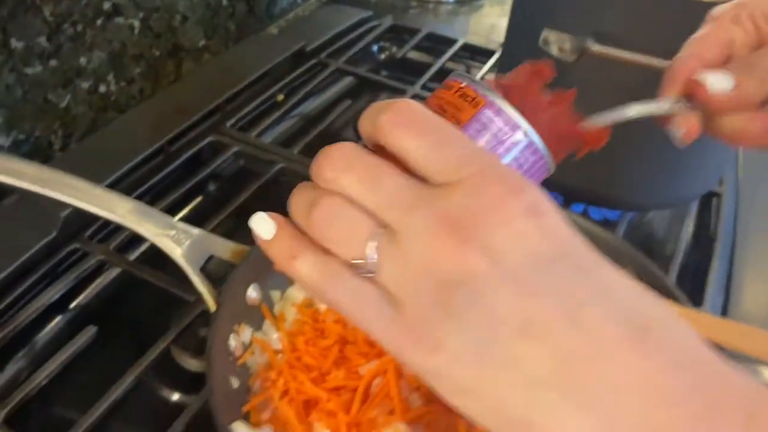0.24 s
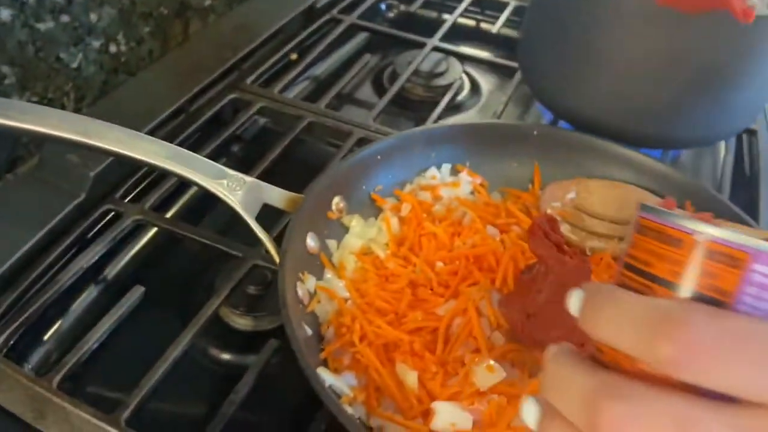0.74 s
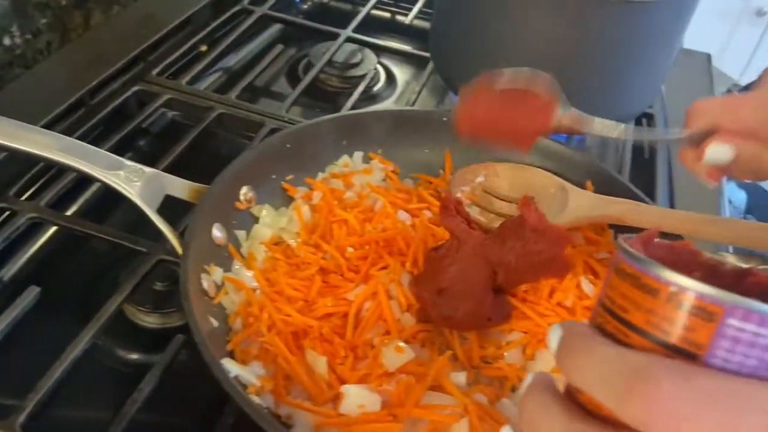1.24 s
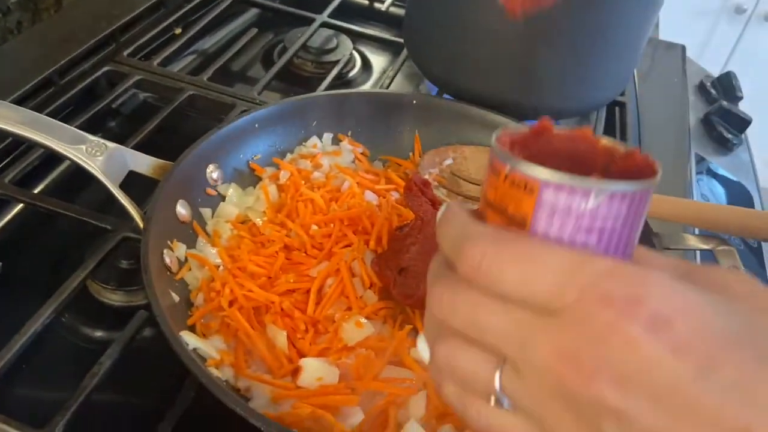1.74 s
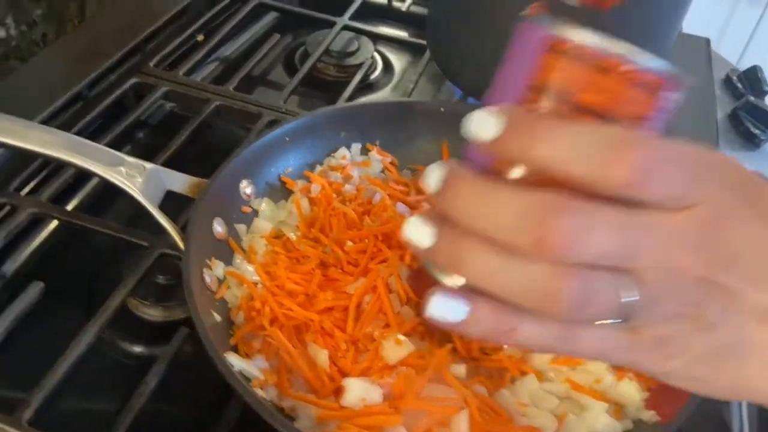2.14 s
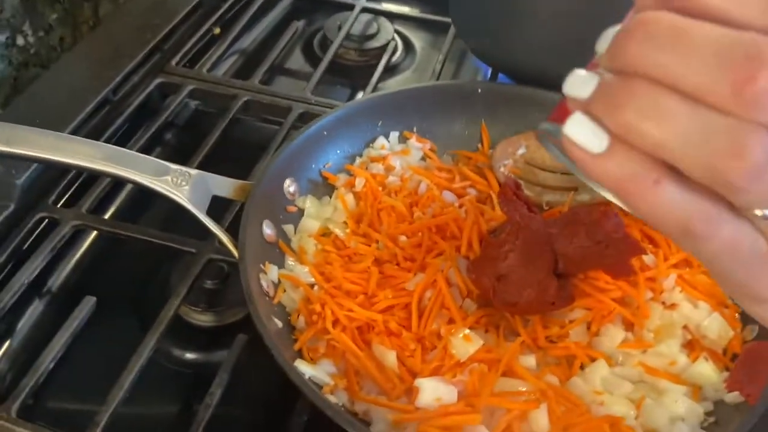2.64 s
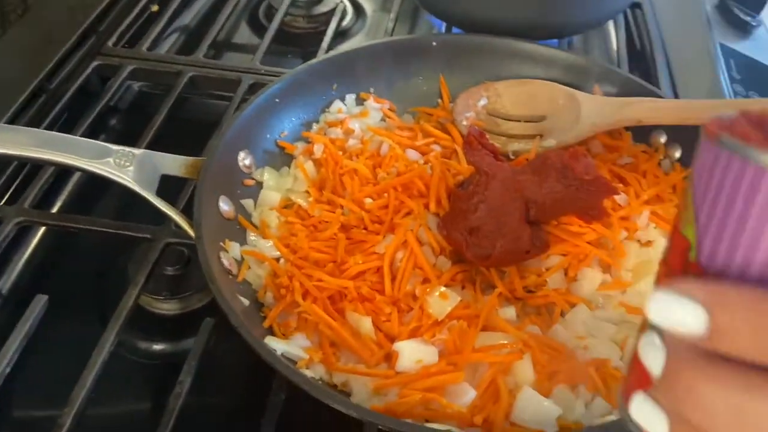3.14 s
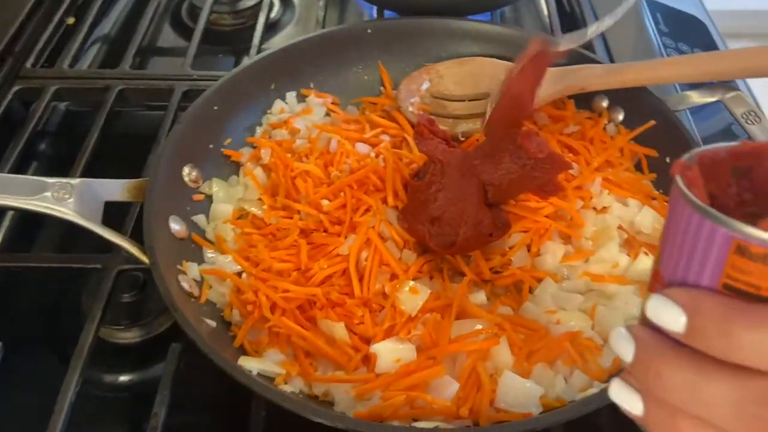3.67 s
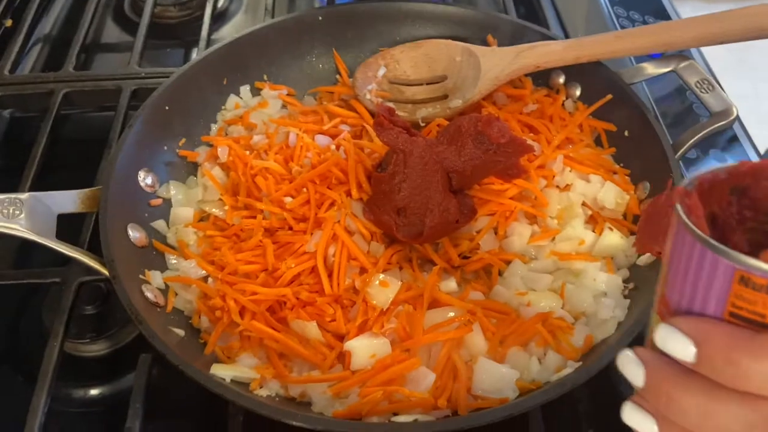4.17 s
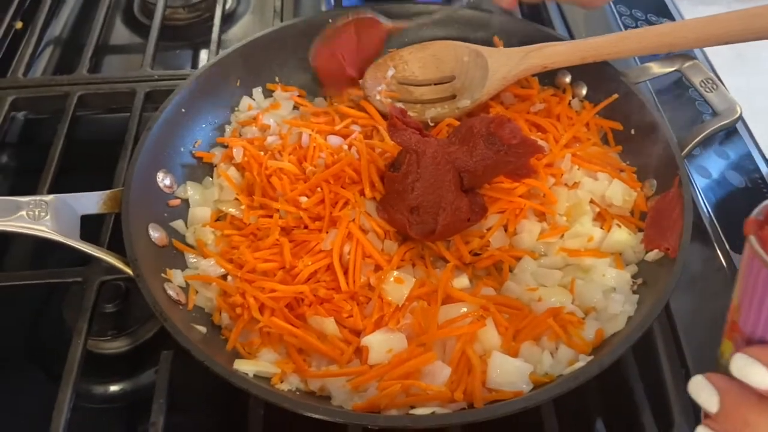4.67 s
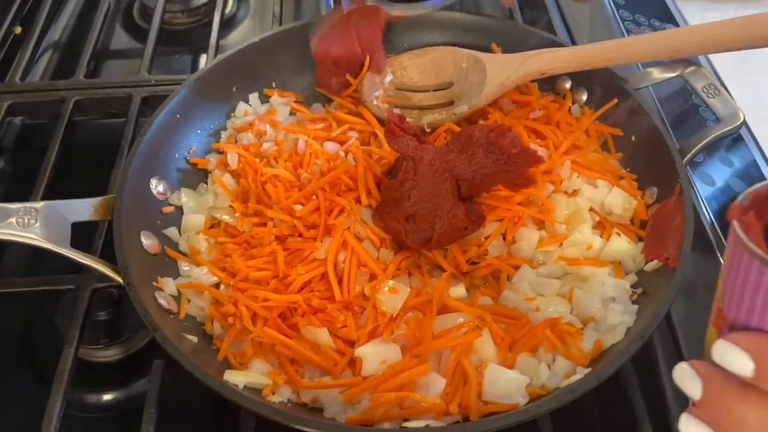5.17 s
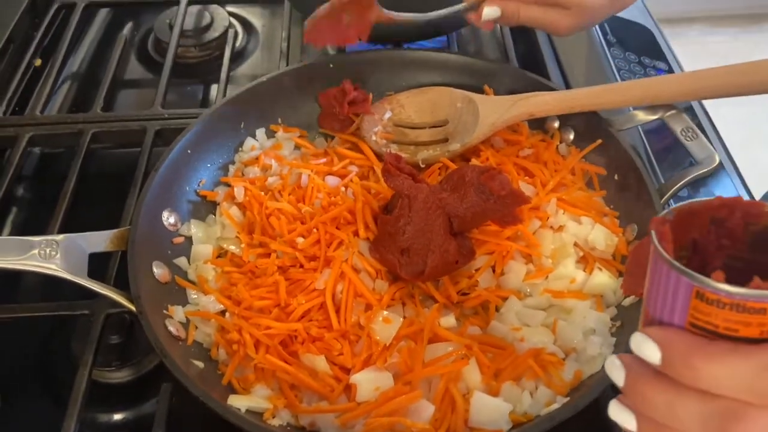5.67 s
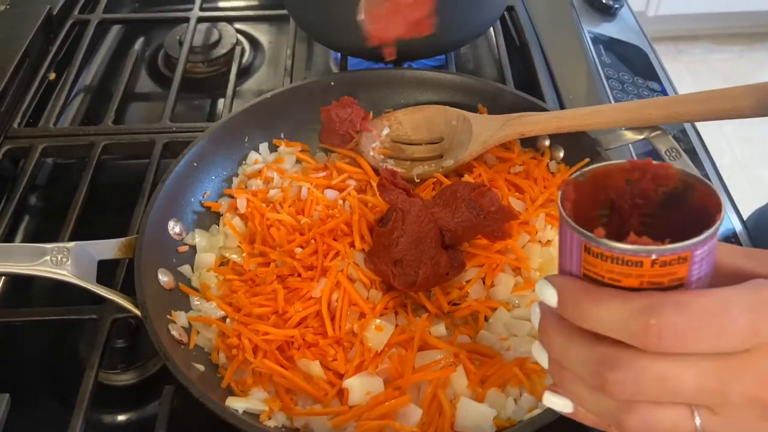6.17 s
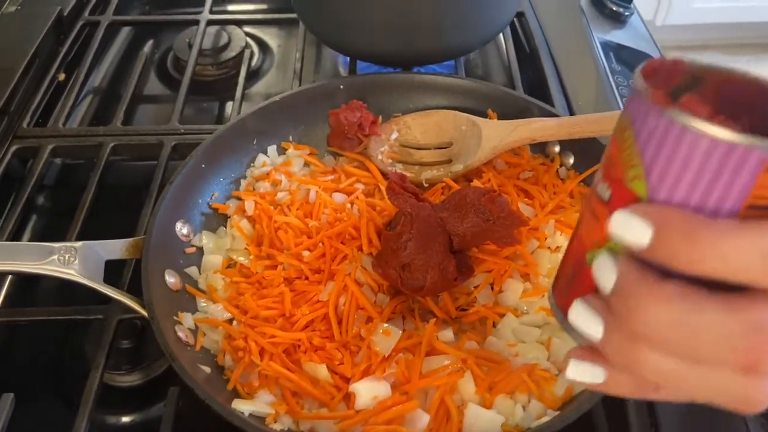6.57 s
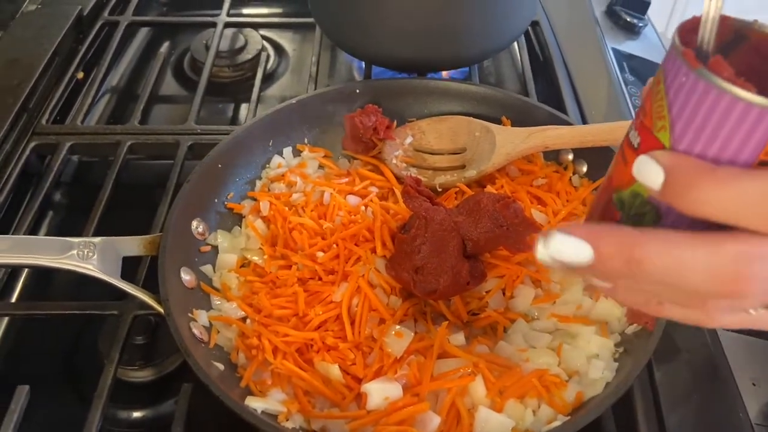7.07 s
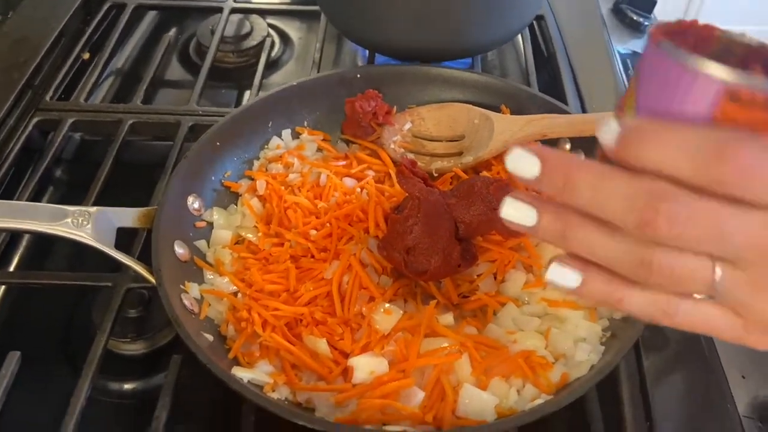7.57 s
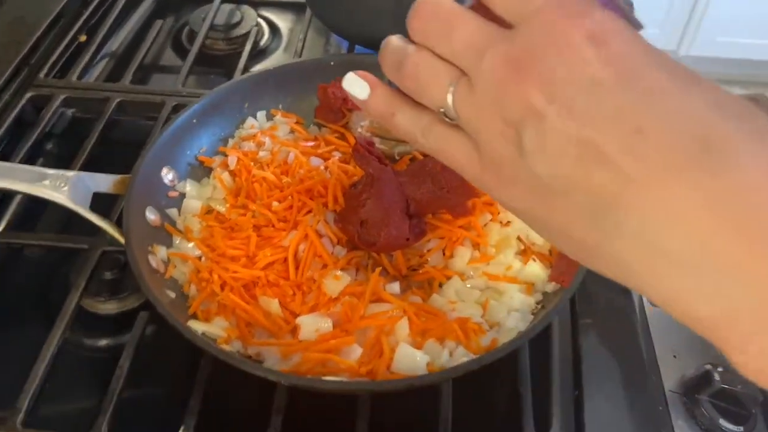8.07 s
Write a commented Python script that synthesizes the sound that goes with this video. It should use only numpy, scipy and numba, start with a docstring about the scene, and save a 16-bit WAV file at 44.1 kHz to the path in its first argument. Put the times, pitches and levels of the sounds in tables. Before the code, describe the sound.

Vegetables sizzle softly while a steel spoon digs in a hollow-sounding can and taps a ringing frying pan in a steady run.

```python
"""Vegetables sizzle quietly over a gas burner in a small kitchen, all on the left channel.
A steel spoon digs tomato paste out of a small can, at the start and again after 2 s, scraping and
knocking so that the air in the can hoots. From 4.7 s it is rapped nine times on the rim of the frying
pan, which rings and rocks on the stove grate; the spoon rings more freely as the paste comes off.
From 6.7 s it is back in the can for more knocks and scrapes and one soft squelch."""
import sys
import numpy as np
from scipy import signal
from scipy.fft import rfft, irfft
from scipy.io import wavfile
from scipy.ndimage import uniform_filter1d
from numba import njit

SR = 44100
rng = np.random.default_rng(int(sys.argv[2]) if len(sys.argv) > 2 else 0)


def inscribe(sig):
    """Save sig as 16-bit PCM at rate SR to the path in sys.argv[1].

    A 1-D sig is mono; a 2-D sig holds one channel per row.
    Samples are clipped to [-1, 1] before scaling.
    """
    pcm = np.round(np.clip(np.atleast_2d(sig).T, -1, 1) * 32767)
    wavfile.write(sys.argv[1], SR, pcm.astype(np.int16))


N = 366912
TIME = np.arange(N) / SR
AGE = TIME[:SR]  # seconds since a hit

# The kitchen's reverb. Each row: band in Hz, t60 in seconds, level in dB.
ROOM_BANDS = [(100, 0.37, 1.5), (402, 0.59, -1.5), (740, 0.33, -6), (1500, 0.45, -18.5), (2730, 0.41, -9.5),
              (5800, 0.44, -14), (14000, 0.26, -9)]
# Tone curves for the noisy layers. Each row: frequency in Hz, relative gain in dB.
BURNER_EQ = [(12, -52), (20, 2), (72, -10.5), (112, -6), (136, -19), (241, -20.5), (313, -18.5),
             (463, -16.5), (511, -9), (573, -16), (795, -13.5), (1000, -24), (1300, -75)]  # rush of burner and fan
SIZZLE_EQ = [(590, -50), (1000, -4), (1370, 1), (1550, -1.5), (2100, -1), (3190, -4.5), (6940, -7.5),
             (14400, -28), (16000, -35)]  # bursting steam bubbles
GRIT_EQ = [(300, -28), (1250, 17), (1900, 7), (2400, 10), (3200, 7), (7000, -1), (15000, -31)]  # the spoon's edge rasping on the can
TICK_EQ = [(500, -17), (2000, 7), (3000, 4), (6500, 10), (9000, 1.5), (12000, -1), (16000, -15)]  # bare steel making contact
RATTLE_EQ = [(150, 0.5), (450, -4.5), (750, 7.5), (1050, 1), (1400, 10.5), (2100, -0.5), (5500, -15.5),
             (16000, -54)]  # the pan clattering on the grate
CLANG_EQ = [(200, -20), (450, -13.5), (720, 1), (1080, 8.5), (1680, -12), (2100, 0), (2650, 2), (3200, -19),
            (3700, 2.5), (4500, 1), (5200, 6), (5900, 4.5), (6250, -3), (6650, 0), (7300, -0.5),
            (7850, -15), (8650, -2), (9800, -8.5), (10500, -1.5), (11600, -23), (14000, -13), (16000, -4)]  # the pan's crowd of high modes
# Ringing metal. Each row: nominal pitch in Hz, relative level in dB, t60 in seconds.
CAN_MODES = [(512, -2, 0.09), (680, 4.5, 0.039), (1173, 1, 0.06), (1430, 2.5, 0.014), (1820, 5.5, 0.0089),
             (2220, -0.5, 0.016), (2480, -5, 0.04), (2820, -7.5, 0.021), (4470, -16, 0.04)]  # the can's thin, paste-coated wall
SPOON_MODES = [(2020, -6, 0.3), (2770, -1, 0.18), (3850, -12, 0.18), (4260, -6, 0.3), (4210, -6, 0.29),
               (5230, -7, 0.26), (5900, -9, 0.14), (8780, 3.5, 0.036)]  # the steel spoon
PAN_MODES = [(308.5, -21.5, 0.087), (584, -34.5, 0.35), (693, -19, 0.13), (715, -25, 0.12),
             (776, -17, 0.13), (748, -3.5, 0.026), (838, -26, 0.093), (964, -17, 0.11), (1298, -9, 0.051),
             (1317, -23, 0.28), (1474, -2.5, 0.029), (1552, 3.5, 0.031), (2523, -10, 0.036),
             (2790, -19.5, 0.089), (3494, -15.5, 0.034), (4990, -10, 0.041), (7050, -29, 0.17),
             (8470, -25.5, 0.067), (10350, -27, 0.071)]  # the pan full of vegetables
# The pan rocking on the grate. Each row: pitch in Hz, level against the rap in dB, t60 in seconds,
# build-up in seconds.
GRATE_MODES = [(57.2, -11.5, 0.5, 0.025), (32.5, -18.5, 1, 0.03), (212.7, -0.5, 0.11, 0.028),
               (155, -17, 0.068, 0.013)]
# The can's held hoots: scrapes, except at 0.292 s, where the hoot lingers briefly after the first knock.
# Each row: start in seconds, length in seconds, level in dB, the hoot's first and last pitch in Hz,
# grit against the hoot in dB.
HELD_HOOTS = [(0, 0.28, -57.5, 878, 715, -17), (0.233, 0.051, -52, 753, 900, -3.5),
              (0.292, 0.06, -58, 950, 975, -14), (2.385, 0.1, -53, 1020, 980, -6.5),
              (2.656, .16, -48.5, 834, 835, -12.5), (2.833, 0.059, -53.5, 835, 870, -2.5),
              (7.168, 0.17, -49, 820, 860, -10.5), (7.335, 0.05, -61, 845, 860, 7)]
# The can's short hoots: knocks, except at 6.7925 s, a soft second swell of the hoot just after the
# 6.784 s knock. Each row: start in seconds, level in dB, hoot pitch in Hz, its t60 in seconds,
# centre of the wall's clank in Hz, then clank and metal tick against the hoot in dB.
SHORT_HOOTS = [(.292, -37.5, 952, 0.023, 1600, -14.5, -21), (2.164, -31, 906, 0.017, 5200, -11, -10),
               (2.192, -38.5, 923, 0.018, 1200, -13.5, -16), (2.377, -35.5, 970, 0.015, 2250, -4.5, -17),
               (2.541, -50.5, 840, 0.015, 700, -10, -19), (2.873, -58.5, 870, 0.028, 1900, 6.5, 0),
               (6.692, -39.5, 853, 0.019, 2900, -7, -2.5), (6.784, -26, 968, 0.018, 1560, -10, -19),
               (6.7925, -29.5, 953, 0.039, 1780, -25, -38), (6.971, -44.5, 797, 0.013, 695, -8, -26),
               (7.191, -49, 810, 0.0088, 2500, -4, -12), (7.350, -32.5, 842, 0.023, 1300, -23, -26),
               (7.357, -40, 885, 0.032, 1300, -19, -22), (7.822, -36, 914, 0.016, 2090, -11, -5.5),
               (7.968, -22, 1024, 0.022, 2190, -11.5, -26), (8.178, -44.5, 860, 0.012, 694, -7.5, -27)]
# Raps on the pan's rim. Each row: start in seconds, level in dB, contact bandwidth in Hz, clink pitch
# in Hz, relative clink level in dB, delay until the pan settles in seconds, relative clatter in dB.
RIM_RAPS = [(4.6537, -23, 9700, 7180, -7, 0.023, -12), (4.818, -23, 4630, 5270, -35, 0.032, -7.5),
            (4.958, -21.5, 5350, 6900, -22, 0.014, -8), (5.104, -21.5, 6350, 7000, -17.5, 0.024, -9),
            (5.2619, -19.5, 8460, 7060, -12, 0.033, -9), (5.4062, -19.5, 8250, 6950, -13.5, 0.042, -10),
            (5.558, -20.5, 8500, 6800, -12, 0.031, -9.5), (5.722, -20.5, 8060, 10700, -21.5, 0.025, -8),
            (5.888, -23.5, 6900, 3950, -4.5, 0.017, -9)]


def undb(db):
    """Decibels to gain."""
    return 10 ** (np.asarray(db) / 20)


def unit(x):
    """Scale to rms 1."""
    return x / np.sqrt(np.mean(x ** 2))


def burst(x):
    """Scale a hit to the energy of 10 ms at rms 1."""
    return x / np.sqrt(np.sum(x ** 2) / (SR * .01))


def add(track, start, x):
    """Mix x into the track at a start in seconds."""
    i = int(start * SR)
    track[i:i + len(x)] += x[:len(track) - i]


def colour(x, curve):
    """Minimum-phase EQ through (Hz, dB) points, so nothing sounds ahead of the attack."""
    hz, db = np.transpose(curve)
    size = 2048
    log_hz = np.log(np.arange(size // 2 + 1) * SR / size + 1)
    log_gain = np.log(undb(np.interp(log_hz, np.log(hz), db)))
    cepstrum = irfft(log_gain)[:size // 2]
    cepstrum[1:] *= 2
    return signal.fftconvolve(x, irfft(np.exp(rfft(cepstrum, size))))[:len(x)]


def colour_bed(x, curve):
    """EQ a scene-long sound through (Hz, dB) points and bring it to rms 1."""
    hz, db = np.transpose(curve)
    log_hz = np.log(np.arange(N // 2 + 1) * SR / N + 1)
    return unit(irfft(rfft(x) * undb(np.interp(log_hz, np.log(hz), db)), N))


def wander(rate):
    """Smooth random drift at rms 1, with `rate` new values a second."""
    hold = int(SR / rate)
    steps = np.repeat(rng.standard_normal(N // hold + 1), hold)
    return unit(uniform_filter1d(steps, hold)[:N])


def fade(t60):
    """Exponential decay, 60 dB down after t60 seconds."""
    return np.exp(-np.log(1000) * AGE / t60)


def noise_hit(t60):
    """White noise with an instant attack and a decaying tail."""
    return rng.standard_normal(SR) * fade(t60)


def ring(modes, stretch=1, scatter_db=0, detune=0, phase_turns=1):
    """Struck metal: the striking point and the grip vary each mode's level, pitch and phase."""
    tones = np.zeros(SR)
    for hz, db, t60 in modes:
        level, phase, pitch = rng.standard_normal(3)
        cycles = hz * (stretch + detune * pitch) * AGE + phase_turns * phase
        tones += undb(db + scatter_db * level) * fade(t60) * np.sin(2 * np.pi * cycles)
    return tones * (1 - np.exp(-AGE / .0007))  # the blow takes a moment to spread through the metal


def clicks(rate, spread_db, size=N):
    """Random tiny impulses; a positive spread makes a few stand out, a negative one sinks them."""
    impulses = (rng.random(size) < rate / SR) * rng.choice([-1, 1], size)
    return unit(impulses * undb(spread_db * np.minimum(rng.exponential(size=size), 5)))


@njit
def bandpass(x, hz, width_hz):
    """State-variable band-pass with a moving centre."""
    out = np.empty(len(x))
    band_state, low_state = 0., 0.
    for i in range(len(x)):
        gain, damping = np.tan(np.pi * hz[i] / SR), width_hz / hz[i]
        band = (band_state + gain * (x[i] - low_state)) / (1 + gain * (gain + damping))
        band_state = 2 * band - band_state
        low_state += 2 * gain * band
        out[i] = damping * band
    return out


def resonate(x, hz, width_hz):
    """Two band-passes in series, each width_hz wide, draw a steady or gliding pitch out of noise."""
    centre = np.full(len(x), hz, dtype=float)
    return bandpass(bandpass(x, centre, width_hz), centre, width_hz)


def kitchen_reverb(x, predelay_s=0.0051, build_s=0.0032):
    """Diffuse echo from worktop, cupboards and walls, with a fresh tail on every call."""
    hz, t60s, db = np.transpose(ROOM_BANDS)
    spectrum = rfft(rng.standard_normal(SR))
    log_hz = np.log(np.arange(len(spectrum)) + 1)
    onset = 1 - np.exp(-np.maximum(AGE - predelay_s, 0) / build_s)
    response = np.zeros(SR)
    for share, t60, gain in zip(np.eye(len(hz)), t60s, undb(db)):
        band = irfft(spectrum * np.interp(log_hz, np.log(hz), share), SR)
        envelope = onset * fade(t60)
        response += gain * band * envelope / np.linalg.norm(envelope)
    return signal.fftconvolve(x, response)[:len(x)]


def stove(burner_db=-60, hum_hz=108, hum_db=-75, sizzle_db=-58):
    """The bed: the burner rushes, a fan hums unevenly, steam bubbles burst under the vegetables."""
    burner = undb(burner_db + 0.29 * wander(5)) * colour_bed(rng.standard_normal(N), BURNER_EQ)
    hum_gain = undb(hum_db + 3.4 * wander(4.9))
    hum = hum_gain * np.sin(2 * np.pi * np.cumsum(hum_hz + 3 * wander(9.2)) / SR)
    bubbles = rng.standard_normal(N) + .5 * clicks(rate=2500, spread_db=3.5)
    sizzle = undb(sizzle_db + 0.38 * wander(2.6)) * colour_bed(bubbles, SIZZLE_EQ)
    return burner + hum + sizzle


def paste_squelch(start=7.385, length=0.063, db=-54):
    """Thick paste pulls away from the spoon with a few low plops."""
    window = np.clip(1 - np.abs(2 * (TIME - start) / length - 1) ** 4, 0, 1)
    plops = clicks(rate=430, spread_db=-1.5)
    return undb(db) * window * colour_bed(plops, [(80, -14), (200, -1), (450, 1), (700, -8), (3000, -48)])


def can_held_hoots(attack_share=0.17, release_share=0.29, edge_db=-11, catch_db=5):
    """The spoon sticks and slips, rasping and sounding the can's air; one hoot just trails a knock."""
    out = np.zeros(N)
    slips = unit(clicks(rate=1600, spread_db=0) * undb(1.2 * wander(90)))
    grit = colour_bed(slips * undb(catch_db * wander(130)), GRIT_EQ)  # spurts as the edge catches the rim
    for start, length, db, start_hz, end_hz, grit_db in HELD_HOOTS:
        during = (TIME >= start) & (TIME < start + length)
        progress = (TIME[during] - start) / length
        envelope = np.minimum(progress / attack_share, (1 - progress) / release_share).clip(max=1)
        hoot_hz = start_hz + (end_hz - start_hz) * progress  # the spoon blocks more or less of the mouth
        hoot = unit(resonate(slips[during], hoot_hz, width_hz=145.))
        gain = undb(db + edge_db * (1 - envelope))
        add(out, start, gain * (hoot + undb(grit_db) * grit[during]))
    return out


def wall_clank(centre_hz, slope_db_per_octave=9):
    """The can's wall favours modes near centre_hz, detuned by the hand's squeeze; the spoon chatters."""
    modes = [(hz, db - slope_db_per_octave * abs(np.log2(hz / centre_hz)), t60)
             for hz, db, t60 in CAN_MODES]
    chatter_eq = [(100, -49)] + [(hz, db) for hz, db, _ in modes] + [(8000, -24), (14000, -80)]
    chatter = burst(colour(noise_hit(t60=0.096), chatter_eq))
    return burst(ring(modes, scatter_db=3, detune=.014)) + .5 * chatter


def spoon_tick(muffle_hz=8550, snap_db=-4, ring_db=-8.5):
    """Steel meets the can: only the first snap is bright, and paste muffles what rings on."""
    snap = burst(colour(noise_hit(t60=0.001), TICK_EQ))
    muffle = signal.butter(2, muffle_hz, fs=SR, output="sos")
    tail = burst(colour(signal.sosfilt(muffle, noise_hit(t60=0.029)), TICK_EQ))
    tick = burst(undb(snap_db) * snap + tail)
    damped_ring = burst(ring(SPOON_MODES) * fade(0.18))
    return burst(tick + undb(ring_db) * damped_ring)


def can_short_hoots(rise_share=0.083, linger_db=-20):
    """The wall pumps the air in the can; pitch and decay depend on how far the spoon blocks the mouth."""
    out = np.zeros(N)
    for start, db, hoot_hz, hoot_t60, clank_hz, clank_db, tick_db in SHORT_HOOTS:
        attack = 1 - np.exp(-AGE / (rise_share * hoot_t60))
        hoot = burst(attack * fade(hoot_t60) * np.sin(2 * np.pi * hoot_hz * AGE))
        metal = undb(clank_db) * wall_clank(clank_hz) + undb(tick_db) * spoon_tick()
        # a thin, wavering tone lingers just above the hoot
        wavering = resonate(rng.standard_normal(SR), 1.01 * hoot_hz, width_hz=100.)
        linger = undb(linger_db) * burst(wavering * fade(t60=0.86))
        add(out, start, undb(db) * (hoot + metal + linger))
    return out


def grate_rocking(detune=0.012):
    """The low end of each rap: the heavy pan shakes the grate, which takes a moment to get going."""
    out = np.zeros(N)
    for start, db, *_ in RIM_RAPS:
        for hz, mode_db, t60, rise_s in GRATE_MODES:
            swing = np.sin(2 * np.pi * hz * (1 + detune * rng.standard_normal()) * AGE)
            envelope = (1 - np.exp(-(AGE / rise_s) ** 2)) * fade(t60)
            add(out, start, undb(db + mode_db) * envelope * swing)
    return out


def grate_clatter(settle_s, spread_s=0.019):
    """The pan settles back on the grate in a cluster of small contacts, hardest around settle_s."""
    envelope = np.exp(-np.abs(AGE - settle_s) / spread_s)
    return burst(colour(clicks(rate=1500, spread_db=-0.5, size=SR) * envelope, RATTLE_EQ))


def spoon_ring(until_last_rap_s, loaded_db=-35, free_db=-12.5, shed_s=0.36):
    """Paste damps the spoon's ring and bare-steel snap until it drops off on the last raps."""
    db = loaded_db + (free_db - loaded_db) * np.exp(-until_last_rap_s / shed_s)
    snap = burst(colour(noise_hit(t60=0.0055), TICK_EQ))
    return undb(db) * (burst(ring(SPOON_MODES)) + snap)


def pan_clang(shared_modes, t60, bounce_s=0.0042, bounce_db=-3, crack_db=-2):
    """The pan's crowd of high modes, partly changing with the striking point, plus a contact crack."""
    contact = fade(t60=.008)
    add(contact, bounce_s, undb(bounce_db) * contact)  # the springy spoon touches the rim twice
    local_modes = burst(noise_hit(t60))
    crack = burst(rng.standard_normal(SR) * contact)
    return burst(colour(shared_modes + local_modes + undb(crack_db) * crack, CLANG_EQ))


def pan_ring(main_hz, nominal_hz=1783, main_db=-3.5, peak_s=0.0045, scatter_db=1.7):
    """The pan's body rings; its main mode swells as the blow travels round the rim, then dies fast."""
    swell = AGE / peak_s * np.exp(1 - AGE / peak_s)
    main = undb(main_db + scatter_db * rng.standard_normal()) * swell * np.sin(2 * np.pi * main_hz * AGE)
    body = ring(PAN_MODES, main_hz / nominal_hz, scatter_db, detune=0.0031, phase_turns=0.12)
    return burst(body + main)


def pan_raps(first_hz=1769.5, rise_hz_per_s=29, clang_t60=0.043, firm_contact_hz=8200, spoon_send_db=-9):
    """The main hits: each rap rings pan and spoon, then the pan clatters back onto the grate."""
    out = np.zeros(N)
    shared_modes = burst(noise_hit(clang_t60))  # the same pan each time
    first_s, last_s = RIM_RAPS[0][0], RIM_RAPS[-1][0]
    for start, db, contact_hz, clink_hz, clink_db, settle_s, clatter_db in RIM_RAPS:
        clang_db = -5 + 3.5 * np.log2(contact_hz / firm_contact_hz)  # sharper contact wakes high modes
        clang = undb(clang_db) * pan_clang(shared_modes, clang_t60)
        body = pan_ring(first_hz + rise_hz_per_s * (start - first_s))  # pitch creeps up from rap to rap
        # the clink's pitch depends on where along its neck the spoon lands
        clink = burst(resonate(noise_hit(clang_t60), clink_hz, width_hz=1200.))
        spoon = spoon_ring(last_s - start) + undb(clink_db) * clink
        soften = signal.butter(2, contact_hz, fs=SR, output="sos")  # paste takes the top off the contact
        pan = signal.sosfilt(soften, body + clang) + undb(clatter_db) * grate_clatter(settle_s)
        # the spoon is close, so fairly dry; moving hands and pan change the echo every time
        echo = kitchen_reverb(pan + undb(spoon_send_db) * spoon)
        add(out, start, undb(db) * (pan + spoon + echo))
    return out


def scene(can_send_db=-6):
    """Mix pan and can over the stove bed; the can is close up, so it sounds drier than the pan."""
    can = can_short_hoots() + can_held_hoots() + paste_squelch()
    mix = pan_raps() + grate_rocking() + can + undb(can_send_db) * kitchen_reverb(can) + stove()
    return np.array([mix, mix])


def record(dry, ceiling=.9, right_db=-83, hiss_db=-92, top_hz=15900):
    """Round off the peaks, leave only a trace on the right, add faint hiss and cut the top steeply."""
    rounded = ceiling * np.tanh(2 * dry / ceiling)
    panned = rounded * np.array([[1], [undb(right_db)]])
    hiss = undb(hiss_db) * rng.standard_normal((2, N))
    top_cut = signal.ellip(8, .2, 70, top_hz, fs=SR, output="sos")
    return signal.sosfilt(top_cut, panned + hiss)


dry = scene()
out = record(dry)
inscribe(out)
```